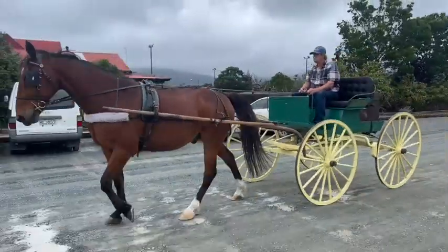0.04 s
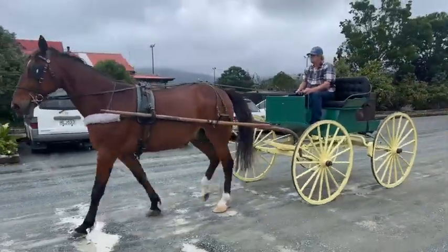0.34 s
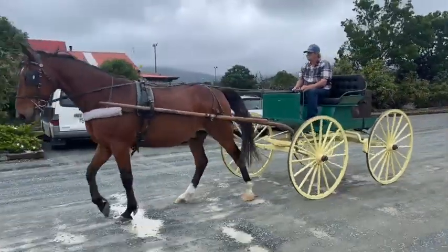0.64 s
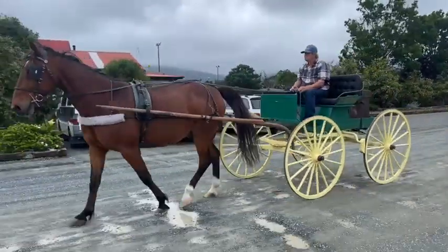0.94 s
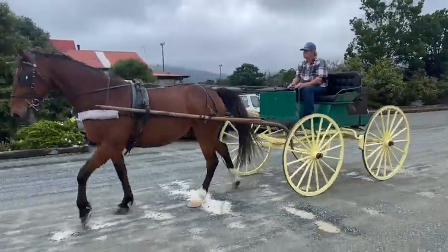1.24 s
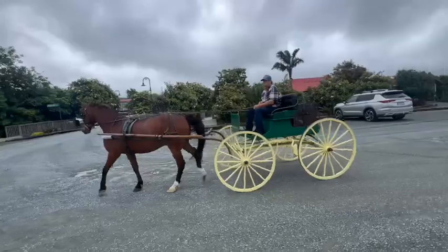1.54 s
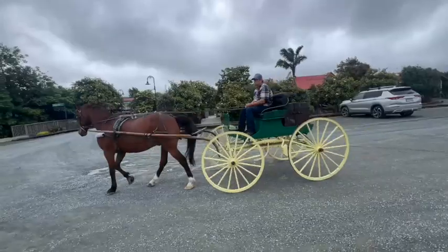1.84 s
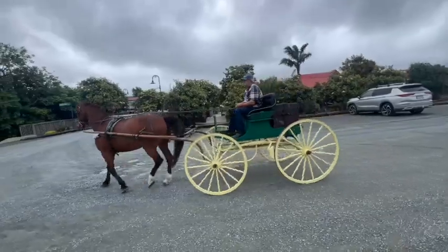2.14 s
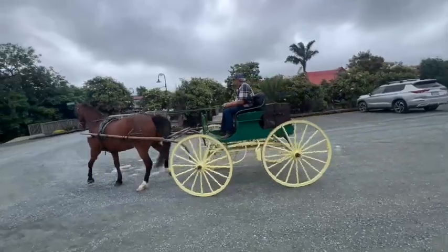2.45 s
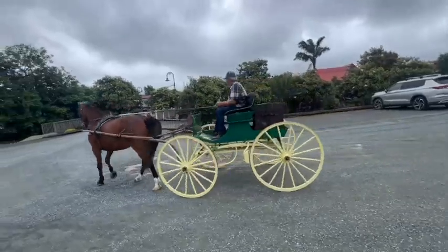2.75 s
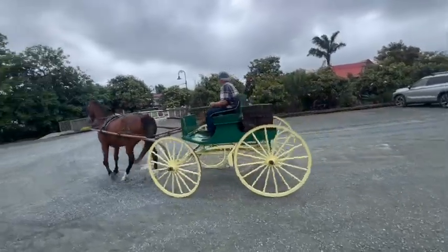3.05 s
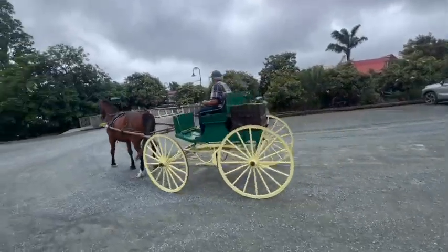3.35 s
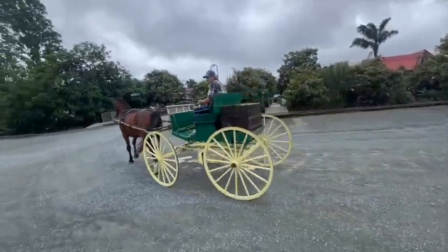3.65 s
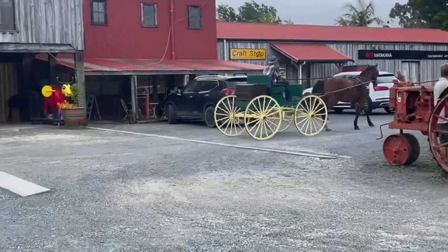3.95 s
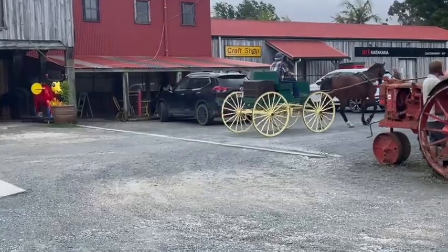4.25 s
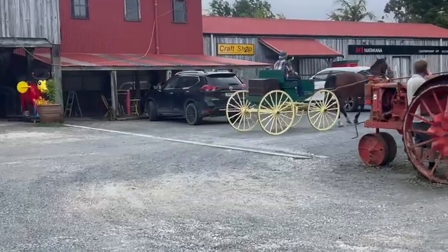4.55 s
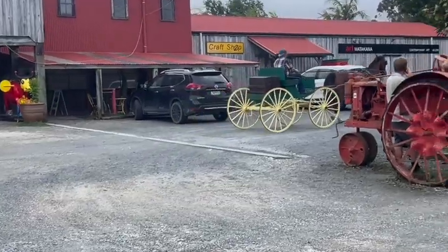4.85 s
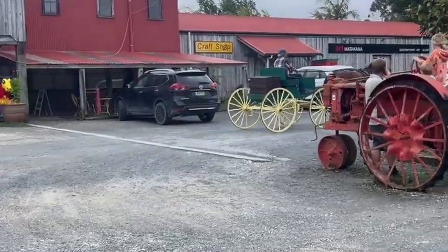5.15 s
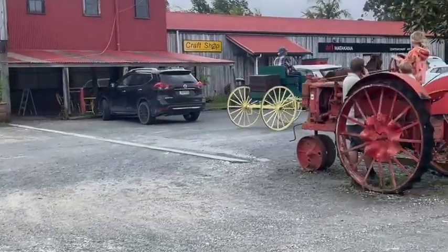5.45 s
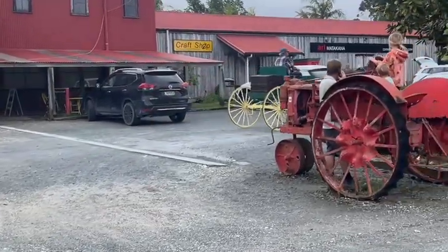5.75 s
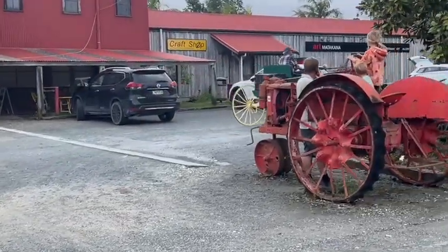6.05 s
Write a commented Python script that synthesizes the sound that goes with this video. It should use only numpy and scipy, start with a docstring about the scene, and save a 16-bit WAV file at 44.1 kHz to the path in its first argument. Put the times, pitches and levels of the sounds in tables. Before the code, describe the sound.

From the start, a horse walks a buggy over a gravel yard, fairly close. The wheels give a continuous gritty crunch, hooves scuff into loose stones, and bigger stones crack at uneven intervals. A hollow hoof knock comes at about 0.4 seconds, with softer ones near 0.7 and 1.4, and a faint patter of fine spray near 0.9. From about 1.5 to 3.6 seconds, strong gusts buffet the microphone with a loud low rumble and dull pops, briefly pushing down the gravel sound while stones keep snapping through. From about 3.8 seconds the wind falls to a few weak puffs, and the horse and buggy sound farther off and duller. Crunching and cracking continue to the end at about 6 seconds, with a strong crack near 4.5 and hoof knocks near 5 and 5.7. Faint outdoor air and a low drone lie underneath throughout.

```python
"""A horse walks a buggy over a gravel yard, first close by, then farther off and duller.
Shoes and wheel rims crack stones over a bed of crunching grit; a few hoof falls knock hollowly
or kick up a fine spray. Faint outdoor air and a low drone sit underneath.
In the middle a run of gusts buffets the microphone and drives the recorder into its limiter."""
import sys
import numpy as np
from scipy import signal
from scipy.fft import rfft, irfft, next_fast_len
from scipy.io import wavfile
from scipy.ndimage import uniform_filter1d, minimum_filter1d

SR = 44100
rng = np.random.default_rng(int(sys.argv[2]) if len(sys.argv) > 2 else 0)


def transcribe(u):
    """Save the signal u as a 16-bit wav file named by the first command-line argument.

    u: samples, shape (n,) or (channels, n), limited to [-1, 1]; the rate is SR.
    q: integer samples, one column per channel.
    """
    v = np.clip(np.atleast_2d(u).T, -1, 1)
    q = np.round(v * 32767).astype(np.int16)
    wavfile.write(sys.argv[1], SR, q)


N = 268563
TIME = np.arange(N) / SR
BANDWIDTH_HZ = 16050

# Cue levels are relative: the layers trim and shape them.
# grit bed under the rolling wheels: t/s, level/dB
WHEEL_GRIT = [(0, -40.3), (0.36, -41.5), (1.8, -41.5), (2.15, -38), (2.38, -40.5), (2.7, -36.5),
              (3.3, -38.5), (3.54, -40.5), (3.8, -41), (3.88, -48.1), (4.0, -46), (4.1, -36), (4.45, -42),
              (4.52, -37.5), (5.22, -38.5), (5.38, -43), (5.72, -39), (6.0, -46.5)]
# hooves pressing into loose gravel: t/s, hold/s, level/dB
HOOF_SCUFFS = [(0.034, 0.11, -38.5), (0.236, 0.032, -38), (0.436, .06, -37.5), (0.645, 0.055, -35),
               (0.825, 0.1, -40), (1.027, 0.041, -38), (1.214, 0.085, -40.5), (1.435, .015, -41),
               (2.098, 0.041, -36), (2.635, 0.078, -39), (4.142, 0.098, -38), (4.826, 0.041, -33),
               (5.08, 0.14, -35), (5.46, 0.036, -35), (5.642, 0.087, -35.5)]
# colour of crushed gravel: f/Hz, level/dB
GRAVEL_EQ = [(150, -9.5), (550, -18), (800, -6), (1100, -0.5), (1300, -5), (1550, 0.5), (2100, -0.5),
             (2700, -3.5), (3200, -0.5), (4900, -2.5), (7500, -15), (11200, -18), (13000, -25.5),
             (16000, -26)]
# ring time of a stone: f/Hz, t60/s
STONE_DECAY = [(600, 0.015), (1800, 0.078), (4000, 0.032), (10000, 0.028)]
# how far off the buggy is: t/s, distance/m
BUGGY_DISTANCE = [(0, 9.7), (3.6, 7.6), (4.0, 16.2), (6.09, 22)]
# breeze under the gusts: t/s, level/dB
BREEZE_BED = [(0, -47), (1.4, -48), (1.6, -32), (3.2, -22), (3.8, -51), (6.09, -47)]
# gusts on the microphone: t/s, hold/s, level/dB, top of the rumble f/Hz
GUST_CUES = [(0.0, 0.043, -30, 80), (0.705, 0.054, -39.5, 90), (0.84, 0.053, -30.5, 75),
             (0.904, 0.029, -23.5, 75), (1.472, 0.12, -17, 680), (1.59, 0.077, -18.5, 600),
             (1.689, 0.066, -10, 850), (1.812, 0.092, -26, 348), (1.926, 0.072, -21.5, 610),
             (1.985, 0.067, -26, 218), (2.116, .1, -23.5, 303), (2.278, 0.052, -16.5, 830),
             (2.334, 0.14, -18.5, 484), (2.489, 0.13, -18.5, 413), (2.64, .07, -15, 640),
             (2.714, 0.096, -13.5, 1070), (2.815, 0.27, -17, 770), (3.093, 0.042, -14.5, 650),
             (3.212, 0.042, -15, 890), (3.269, 0.16, -17.5, 696), (3.434, 0.13, -21, 500),
             (3.573, .13, -29.5, 332), (3.82, 0.016, -29, 450), (3.91, 0.023, -25, 370),
             (4.14, 0.13, -38, 119), (4.493, 0.14, -42, 192), (4.769, .17, -39, 194)]
# colour of a full gust: f/Hz, level/dB
GUST_EQ = [(35, -22), (65, 2.5), (130, 2), (300, -2), (600, -7), (1200, -11.5), (3000, -14)]
# colour of the far outdoor air: f/Hz, level/dB
AIR_EQ = [(60, -14), (110, 0), (200, 3.5), (450, 6), (1000, 6.5), (4000, -30.5), (8000, -13), (16000, -58)]
# big stones cracking under shoe or rim: t/s, level/dB, brightness/dB
CRACK_CUES = [(0.179, -22, -34), (0.2736, -21, -18), (0.2836, -22.5, -11), (0.4311, -15, -44),
              (0.4697, -24, -25), (0.6247, -20.5, -24), (0.6815, -16.5, -37), (0.693, -21.5, -12),
              (1.0237, -23.5, -22), (1.244, -20.5, -28), (1.366, -19, -14), (1.4412, -15.5, -25),
              (1.4475, -19.5, -11), (1.7344, -12.5, -13), (1.8393, -22, -26), (1.8856, -17.5, -23),
              (1.9703, -17.5, -16), (2.032, -21.5, -16), (2.4808, -22, -23), (2.5227, -23, -15),
              (2.5506, -21, -17), (2.631, -14, -19), (2.762, -17, -8), (2.8099, -12, -46),
              (2.8877, -11.5, -25), (2.9682, -14, -23), (3.0935, -21, -21), (3.1258, -13, -18.5),
              (3.2091, -11.5, -17), (3.2918, -19, -30), (3.3138, -11.5, -20), (3.3521, -16.5, -30),
              (3.7212, -20.5, -32), (3.759, -21, -28), (3.8038, -23.5, -26), (3.8234, -22.5, -24),
              (4.0757, -19.5, -28), (4.2504, -22, -23), (4.3176, -21, -23), (4.365, -21, -25),
              (4.4793, -11, -30), (4.5764, -18, -23), (4.6448, -20, -24), (4.6871, -19.5, -33),
              (4.7741, -20, -28), (4.796, -19.5, -27), (5.006, -18.5, -26), (5.049, -17, -21),
              (5.1595, -16.5, -31), (5.218, -18.5, -21), (5.3198, -22, -29), (5.665, -19.5, -37),
              (6.0653, -22, -21)]
# hooves landing on firm ground: t/s, level/dB
HOOF_FALLS = [(0.434, -19.5), (.683, -28.5), (1.443, -29), (5.009, -29.5), (5.667, -28), (5.687, -20)]
# resonances of hoof wall and shoe: f/Hz, level/dB, t60/s
HOOF_RING = [(556, 5, 0.047), (726, -29.5, 0.39), (827, 16.5, 0.017), (1070, -6.5, 0.36), (1480, -32, 0.13)]
# water or sand thrown by a hoof: t/s, hold/s, level/dB
SPRAY_CUES = [(0.85, .1, -46.5), (2.05, 0.051, -49), (5.056, .14, -50.5)]
# single eddies slapping the microphone: t/s, level/dB
BUFFET_CUES = [(1.483, -14.5), (1.511, -9), (1.577, -13.5), (1.656, -5.5), (1.734, -5.5), (1.944, -13.5),
               (2.295, -13), (2.58, -4), (2.731, -6.5), (2.941, -6), (3.036, -6)]


def gain_of(db):
    """Decibels to amplitude."""
    return 10 ** (np.asarray(db) / 20)


def unit_rms(x):
    """Normalises to rms 1."""
    return x / np.sqrt(np.mean(x ** 2) + 1e-20)


def curve_at(points, hz):
    """Reads a curve on a log-frequency axis."""
    f, value = np.transpose(points)
    return np.interp(np.log(hz + 1), np.log(f + 1), value)


def add(mix, s, sound):
    """Drops a sound into the mix at s seconds."""
    part = mix[max(round(s * SR), 0):][:len(sound)]
    part += sound[:len(part)]


def eq(x, points):
    """Minimum-phase EQ: attacks stay crisp, with no pre-ring."""
    size = 4096
    log_gain = np.log(gain_of(curve_at(points, abs(np.fft.fftfreq(size, 1 / SR)))))
    taps = np.fft.ifft(np.exp(np.conj(signal.hilbert(log_gain)))).real
    return signal.oaconvolve(x, taps[:size // 2])[:len(x)]


def band(x, lo_hz, hi_hz):
    """Gentle band-pass."""
    return signal.sosfilt(signal.butter(2, [lo_hz, hi_hz], "band", fs=SR, output="sos"), x)


def split(x, centres):
    """Crossover: overlapping bands that sum to the whole."""
    size = next_fast_len(len(x))
    spectrum, hz = rfft(x, size), np.fft.rfftfreq(size, 1 / SR)
    shares = [curve_at(np.c_[centres, solo], hz) for solo in np.eye(len(centres))]
    return np.array([irfft(spectrum * share, size)[:len(x)] for share in shares])


def wander(rate_hz):
    """Random modulator of rms 1, rolled off above the rate."""
    size = next_fast_len(N)
    rolloff = 1 + (np.fft.rfftfreq(size, 1 / SR) / rate_hz) ** 4
    return unit_rms(irfft(rfft(rng.standard_normal(size)) / rolloff, size)[:N])


def swell(start_s, hold_s, attack_s, release_s):
    """Cue envelope: ramps in, then dies away from hold_s after its start."""
    t = TIME - start_s
    return np.clip(t / attack_s, 0, 1) * np.exp(-np.maximum(t - hold_s, 0) / release_s)


def decay(t, t60):
    """Ring-out that loses 60 dB in t60 seconds."""
    return np.exp(-np.log(1000) * t / t60)


def stone(tick, size=2600):
    """One snap: a sharp tick, then the short random ringing of the stones around it."""
    hz, t60 = np.transpose(STONE_DECAY)
    bands = split(rng.standard_normal(size), hz)
    ring = (bands * decay(np.arange(size) / SR, t60[:, None])).sum(0)
    ring /= np.linalg.norm(ring)
    ring[0] += tick
    return ring


def stone_colour(spread_db, count=14):
    """Random EQ curve: each stone's size and shape favour their own pitches."""
    return np.c_[np.geomspace(700, BANDWIDTH_HZ, count), spread_db * rng.standard_normal(count)]


def dulling_db(s, db_per_m=0.57):
    """Top end lost over the buggy's distance at s seconds."""
    return -db_per_m * np.interp(s, *np.transpose(BUGGY_DISTANCE))


def grit(level_db=0.42, treble_db=-6.5, grains_per_s=2600, spread_db=4, clump_db=3.0, kinds=22):
    """Thousands of small stones snap in clumps under rims and hooves; distance dulls the crunch."""
    sizes = gain_of(spread_db * np.minimum(rng.exponential(1, N), 4)) * rng.choice([-1, 1], N)
    snaps = sizes * (rng.random(N) < grains_per_s / SR) * gain_of(clump_db * wander(rate_hz=81))
    kind = rng.integers(0, kinds, N)
    stones = [unit_rms(eq(stone(tick=0.44), stone_colour(spread_db=5))) for _ in range(kinds)]
    grains = sum(signal.oaconvolve(snaps * (kind == k), one)[:N] for k, one in enumerate(stones))
    crunch = eq(grains, GRAVEL_EQ)
    crunch /= np.sqrt(uniform_filter1d(crunch ** 2, size=3000))  # level it so the cues set the dynamics
    rolling = gain_of(np.interp(TIME, *np.transpose(WHEEL_GRIT)) + level_db)
    scuffing = sum(gain_of(db) * swell(s, hold, attack_s=0.0027, release_s=0.034)
                   for s, hold, db in HOOF_SCUFFS)
    body = signal.sosfiltfilt(signal.butter(4, 6500, fs=SR, output="sos"), crunch)
    sizzle = gain_of(treble_db + dulling_db(TIME)) * unit_rms(crunch - body)
    return np.hypot(rolling, scuffing) * (unit_rms(body) + sizzle)


def wind(level_db=1, eddy_db=2.0, flutter_octaves=0.33, opening_curve=0.89, breeze_top_hz=159):
    """Gusts rise out of a breeze; each eddy on the microphone lifts the rumble and opens its top."""
    strength = gain_of(np.interp(TIME, *np.transpose(BREEZE_BED)))
    top_hz = breeze_top_hz
    for s, hold, db, hz in GUST_CUES:
        force = swell(s, hold, attack_s=0.016, release_s=0.024)
        strength = np.maximum(strength, gain_of(db) * force)
        top_hz = top_hz + (hz - top_hz) * force ** opening_curve
    eddies = wander(rate_hz=84)
    cutoff_hz = top_hz * 2 ** (flutter_octaves * eddies)
    centres = np.geomspace(70, 3500, 12)
    rolloff = np.sqrt(1 + (centres[:, None] / cutoff_hz) ** 6)  # a moving low-pass
    pressure = (split(rng.standard_normal(N), centres) / rolloff).sum(0)
    rumble = band(eq(pressure * gain_of(eddy_db * eddies), GUST_EQ), 7.8, 1800)
    rumble /= np.sqrt(uniform_filter1d(rumble ** 2, size=2000) + 1e-20)
    return gain_of(level_db) * strength * rumble


def background(air_db=-48.5, drone_db=-46):
    """Far outdoor air with a faint low drone, as of distant traffic."""
    air = unit_rms(eq(rng.standard_normal(N), AIR_EQ))
    drone = unit_rms(band(rng.standard_normal(N), 82, 104))
    return gain_of(air_db) * air + gain_of(drone_db) * drone


def crack(level_db, bright_db, chips_per_s=2400, chip_size=0.35, crumble_s=0.0072, hard_db=-21):
    """A stone breaks with one snap and a dying shower of chips."""
    size = 4400
    fade_s = crumble_s / max(1, gain_of(level_db - hard_db))  # a hard blow bursts the stone sooner
    chips = chip_size * rng.uniform(-1.94, 2.04, size) * (rng.random(size) < chips_per_s / SR)
    chips *= np.exp(-np.arange(size) / SR / fade_s)
    chips[0] = 1  # the first snap is the hardest
    snap = eq(signal.fftconvolve(chips, stone(tick=0.56))[:size], GRAVEL_EQ)
    snap = eq(snap, [(4500, 0), (9000, bright_db)])  # high shelf
    snap = eq(snap, stone_colour(spread_db=1.0))
    loudest_rms = np.sqrt(uniform_filter1d(snap ** 2, size=130).max())
    return gain_of(level_db) * snap / loudest_rms


def small_cracks(over_grit_db=7, spread_db=7.5, bright_db=4, count=50):
    """Smaller stones give way at uneven intervals, riding the level of the grit under the rims."""
    out = np.zeros(N)
    for k, (jitter, weight) in enumerate(rng.random((count, 2))):
        s = (k + jitter) / count * N / SR
        db = np.interp(s, *np.transpose(WHEEL_GRIT)) + over_grit_db + spread_db * (2 * weight - 1)
        add(out, s, crack(db, bright_db + dulling_db(s)))
    return out


def big_cracks(level_db=-7, usual_treble_db=-21, contrast=0.75):
    """Accents: big stones break under shoe or rim, some brighter than others."""
    out = np.zeros(N)
    for s, db, treble_db in CRACK_CUES:
        add(out, s, crack(db + level_db, bright_db=contrast * (treble_db - usual_treble_db)))
    return out


def hooves(level_db=-5, detune=0.048, attack_s=0.0039):
    """A short scuffing blow rings hoof and shoe: a hollow knock, tuned a little differently each time."""
    out, t = np.zeros(N), np.arange(4400) / SR
    for s, peak_db in HOOF_FALLS:
        tunings = 1 + detune * rng.standard_normal(len(HOOF_RING))
        phases = 2 * np.pi * rng.random(len(HOOF_RING))
        knock = sum(gain_of(db) * decay(t, t60) * np.sin(2 * np.pi * hz * tuning * t + phase)
                    for (hz, db, t60), tuning, phase in zip(HOOF_RING, tunings, phases))
        knock *= 1 - np.exp(-t / attack_s)
        add(out, s, gain_of(peak_db + level_db) * knock / abs(knock).max())
    return out


def sprays(drops_per_s=2500):
    """Fine spray thrown by a hoof patters back onto the ground."""
    drops = rng.standard_normal(N) * (rng.random(N) < drops_per_s / SR)
    envelope = sum(gain_of(db) * swell(s, hold, attack_s=0.03, release_s=0.14)
                   for s, hold, db in SPRAY_CUES)
    return envelope * unit_rms(band(drops, 6000, 12000))


def buffets(level_db=1, fade_s=0.0005):
    """Hard eddies slap the microphone, each a short, dull pop."""
    out, t = np.zeros(N), np.arange(1300) / SR
    for s, peak_db in BUFFET_CUES:
        slap = rng.standard_normal(len(t)) * np.exp(-t / fade_s)
        pop = band(band(slap, 300, 1100), 62, 1130)
        add(out, s, gain_of(peak_db + level_db) * pop / abs(pop).max())
    return out


def yard(x, wet_db=-11, t60=0.11, echoes_per_s=2000, predelay_s=0.005, size=16000):
    """Walls and parked cars scatter a faint, short midrange tail."""
    t = np.arange(size) / SR
    echoes = rng.standard_normal(size) * (rng.random(size) < echoes_per_s / SR)
    echoes *= (t > predelay_s) * decay(t, t60)
    tail = signal.oaconvolve(band(x, 450, 2940), echoes / np.linalg.norm(echoes))[:N]
    return x + gain_of(wet_db) * tail


def scene():
    """Mono mix: horse and buggy through the yard reverb, wind and background dry."""
    horse_and_buggy = big_cracks() + small_cracks() + hooves() + grit() + sprays()
    return (yard(horse_and_buggy) + wind() + buffets() + background())[None]


def record(dry, ceiling=0.47, recovery_db_per_s=70, low_cut_hz=46):
    """Low cut, a limiter that catches wind peaks and ducks the gravel with them, then a high cut."""
    heard = signal.sosfilt(signal.butter(4, low_cut_hz, "high", fs=SR, output="sos"), dry)
    over_db = 20 * np.log10(np.maximum(abs(heard[0]) / ceiling, 1))
    recovery_db = recovery_db_per_s * TIME
    reduction_db = np.maximum.accumulate(over_db + recovery_db) - recovery_db
    gain = uniform_filter1d(minimum_filter1d(gain_of(-reduction_db), size=91), size=91)  # 2 ms look-ahead
    high_cut = signal.firwin(511, BANDWIDTH_HZ, window=("kaiser", 9), fs=SR)
    return signal.oaconvolve(heard * gain, high_cut[None], "same")


dry = scene()
out = record(dry)
transcribe(out)
```